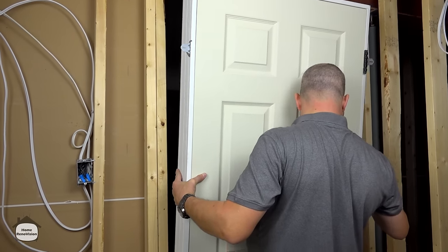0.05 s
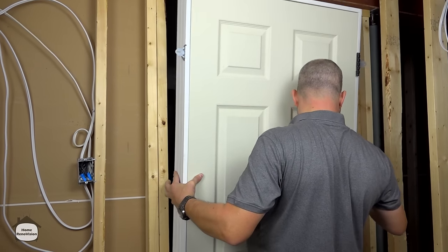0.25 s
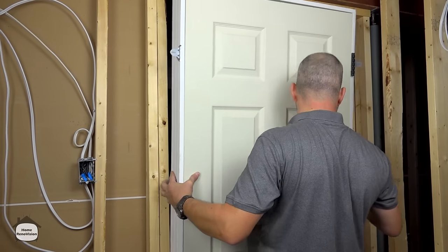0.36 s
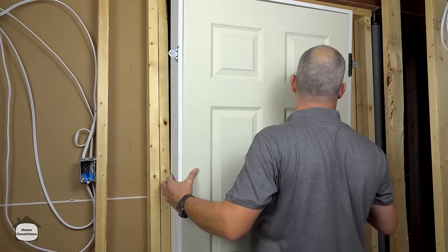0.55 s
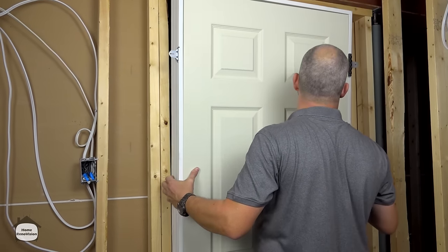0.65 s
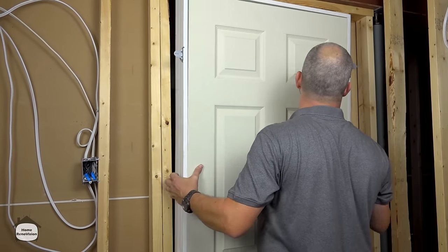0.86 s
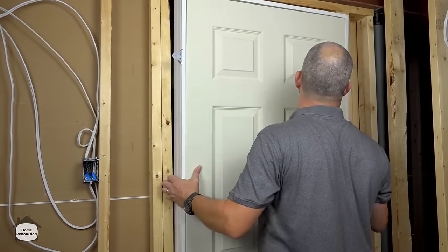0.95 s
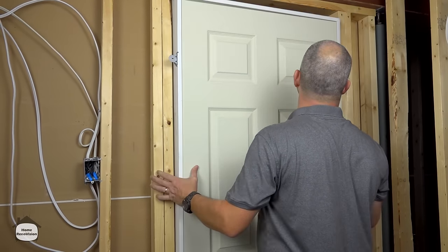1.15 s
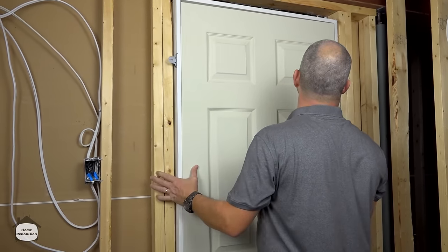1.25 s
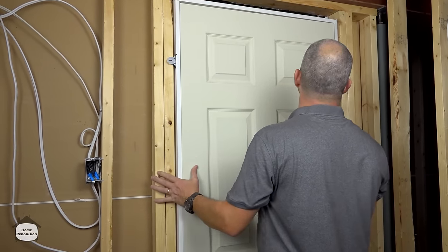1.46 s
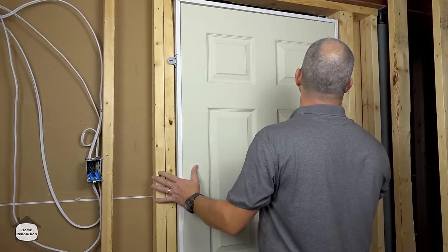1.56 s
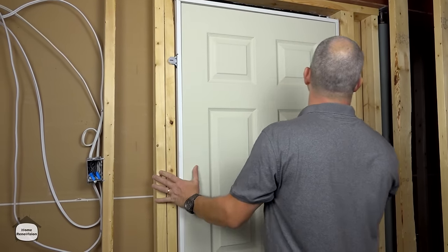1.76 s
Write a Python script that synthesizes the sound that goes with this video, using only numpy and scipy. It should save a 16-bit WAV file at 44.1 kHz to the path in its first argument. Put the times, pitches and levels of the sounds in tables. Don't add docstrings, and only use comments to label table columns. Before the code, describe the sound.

Heavy wooden knocking of a hollow door and frame pushed into a stud opening, close up indoors. A faint knock and gritty hiss start it; at 0.2-0.3 s hard blows cluster with snaps and ticks. Scraping and lighter knocks fade until 0.9 s, when thumps return with low wall booms. Around 1.2-1.4 s another shove cracks sharply, with thin squeaks, then small knocks and rubbing die away.

```python
import sys
import numpy as np
from scipy import signal
from scipy.fft import rfft, irfft, next_fast_len
from scipy.io import wavfile
from scipy.ndimage import map_coordinates

SR = 44100
rng = np.random.default_rng(int(sys.argv[2]) if len(sys.argv) > 2 else 0)


def boost_factor(decibels):
    exponent = np.asarray(decibels, float) / 20
    return 10 ** exponent


def to_wav(sig):
    pcm = np.clip(np.atleast_2d(sig), -1, 1) * 32767
    pcm = np.round(pcm).astype(np.int16)
    wavfile.write(sys.argv[1], SR, pcm.T)


N = 79380


def clock(samples):
    return np.arange(samples) / SR


def unit(x):
    return x / np.sqrt(np.mean(x ** 2) + 1e-20)


def along(points, hz):
    f, v = np.transpose(points)
    return np.interp(np.log(hz + 1), np.log(f + 1), v)


def curves(rows):
    s, *cols = np.transpose(rows)
    return [np.interp(clock(N), s, c) for c in cols]


def wobble(rate_hz):
    knots = rng.standard_normal(int(N * rate_hz / SR) + 4)
    return map_coordinates(knots, [np.arange(N) * rate_hz / SR])


def filtered(x, response):
    m = next_fast_len(len(x) + 8192)
    f = np.fft.rfftfreq(m, 1 / SR)
    return irfft(rfft(x, m) * response(f), m)[:len(x)]


def peak(f, hz, width_hz):
    return 1j * f * width_hz / (hz * hz - f * f + 1j * f * width_hz)


def hiss(points):
    return unit(filtered(rng.standard_normal(N), lambda f: boost_factor(along(points, f))))


def ring(t, hz, db, t60_s, rise_s):
    decay = boost_factor(db - 60 * t / max(t60_s, .003))
    return decay * np.sin(2 * np.pi * hz * t) * (1 - np.exp(-t / rise_s))


def add(track, s, sound):
    part = track[round(s * SR):][:len(sound)]
    part += sound[:len(part)]


# f/Hz, t60/s
WOOD_T60 = [(130, 0.25), (400, 0.13), (1000, 0.085), (3000, 0.072)]


def timber(t, shape, rise_s, count, tilt_db=0):
    lo, hi = np.log(shape[0][0]), np.log(shape[-1][0])
    place, level, sign = rng.random((count, 3)).T
    hz = np.exp(lo + (hi - lo) * (np.arange(count) + place) / count)
    octaves = np.clip(np.log2(hz / shape[1][0]), 0, None)
    db = along(shape, hz) + tilt_db * octaves + 8 * (level - .5)
    return sum(ring(t, f, g, along(WOOD_T60, f), rise_s) * np.sign(u - .5) for f, g, u in zip(hz, db, sign))


# t/s, peak level/dB, panel f/Hz, hardness/dB, panel t60/s
KNOCKS = [(.062, -43, 390, -14, 0.085), (0.129, -38, 220, -8, 0.12), (1.286, -17, 233, -22, 0.057),
          (.213, -19, 435, -12, 0.036), (.230, -3.5, 155, -14, 0.07), (.242, -13.5, 291, -5.5, 0.057),
          (.257, -7, 391.2, -15, 0.079), (0.269, -4, 189, -38, 0.075), (.277, -4.5, 187, -44, 0.038),
          (0.312, -19.5, 149, -32, .04), (.443, -17.5, 299, -10.5, 0.05), (0.456, -20, 268, -16, 0.055),
          (.5, -21.5, 205, -19, 0.046), (.522, -22.5, 315, -28, 0.054), (0.57, -28, 181, -39, 0.086),
          (0.666, -29.5, 188, -30.5, 0.066), (0.912, -22.5, 178, -10.5, 0.11),
          (0.921, -8.5, 133, -16.5, 0.13), (0.938, -4, 135, -36, 0.064), (.981, -13.5, 176, -13.5, 0.075),
          (1.003, -9, 224.3, -19.5, 0.076), (1.029, -12.5, 267, -20, 0.094),
          (1.21, -18.5, 320, -21.5, 0.05), (1.219, -14, 170.5, -9.5, 0.057),
          (1.253, -14.5, 161, -15, 0.053), (1.339, -7, 155, -16, 0.041), (1.365, -14.5, 169, -5, 0.065),
          (1.386, -15.5, 199.4, -6.5, 0.086), (1.498, -21, 140, -15, .08), (1.56, -23, 181.6, -24.5, 0.071),
          (.16, -34, 383, -14, .1), (0.298, -17, 366, -39, 0.08), (0.794, -47.5, 336, -21, 0.089),
          (0.829, -33, 143, -47, 0.075), (1.05, -26.5, 390, -25, .1), (1.424, -23, 140, -27, 0.056)]
# f/Hz, level/dB
SLAB = [(130, -4), (250, -4.5), (400, -4.5), (700, -9.5)]
# f/Hz, level/dB
JAMB = [(500, -2.5), (900, -1.5), (1350, -1.5), (2300, -11.5)]


def knocks():
    out, t = np.zeros(N), clock(SR // 5)
    rise_s, slab_db, slab_follows, jamb_db = 0.0031, -7, 0.41, -10
    soft_dulls = .33
    for s, db, hz, hard_db, t60_s in KNOCKS:
        panel = ring(t, hz, 0, t60_s, rise_s)
        slab = boost_factor(slab_db + slab_follows * hard_db) * timber(t, SLAB, rise_s, count=10)
        jamb = timber(t, JAMB, rise_s=0.00043, count=24, tilt_db=soft_dulls * hard_db)
        add(out, s, boost_factor(db) * (panel + slab + boost_factor(jamb_db + hard_db) * jamb))
    return out


# t/s, level/dB
CRACKS = [
    (1.3385, -11.5),
    (1.3418, -30),
    (1.391, -28.5),
]
# f/Hz, level/dB, t60/s
CRACK_MODES = [(1050, -1, .03), (1600, -5, .02), (2120, -1, .025), (2900, -6, .015), (3270, 0, .022),
               (3800, -2, .016), (5200, -8, .016), (5650, -9, .016)]


def cracks():
    out, t = np.zeros(N), clock(SR // 10)
    for s, db in CRACKS:
        modes = [ring(t, hz, db + g + rng.normal(0, 0.67), t60_s, 0.00068) for hz, g, t60_s in CRACK_MODES]
        add(out, s, sum(modes))
    return out


def burst(hz, db, t60_s, width, roof):
    t = clock(SR // 10)
    noise = rng.standard_normal(len(t))
    noise = unit(filtered(noise, lambda f: peak(f, hz, width * hz) / (1 + 1j * f / (roof * hz)) ** 6))
    return noise * boost_factor(db - 60 * t / max(t60_s, .003)) * (1 - np.exp(-t / 0.00019))


# t/s, peak level/dB, centre f/Hz, t60/s
SNAPS = [(.058, -51.5, 1830, 0.022), (.193, -36.5, 1900, 0.032), (.229, -20.5, 2620, 0.04),
         (.2515, -20, 2690, 0.025), (.238, -17.5, 1530, 0.061), (.913, -35, 3300, 0.037),
         (.921, -31.5, 2210, 0.052), (.980, -39, 2410, 0.073), (.998, -30, 1980, 0.036),
         (1.031, -31, 1520, 0.029), (1.219, -30, 2180, 0.031), (1.3095, -30.5, 2440, 0.017),
         (1.3385, -9.5, 2440, 0.013), (1.3445, -11, 1870, 0.011), (1.347, -33, 6650, 0.13),
         (1.367, -26, 1300, 0.04), (1.392, -19, 2280, 0.043), (1.499, -38, 1760, 0.054),
         (.217, -34, 3020, 0.036), (.245, -26, 1490, .03), (.259, -28, 1700, 0.021),
         (.292, -31, 1710, 0.02), (.127, -49, 1070, 0.033), (1.252, -44, 4200, 0.068),
         (1.263, -37, 1400, 0.017), (1.306, -34.5, 3550, .012), (1.424, -37, 2800, 0.027),
         (1.409, -36, 1700, .025)]


def snaps():
    out = np.zeros(N)
    for s, db, hz, t60_s in SNAPS:
        add(out, s, burst(hz, db - 2, t60_s, width=0.88, roof=2.41))
    return out


# t/s, peak level/dB, centre f/Hz
TICKS = [(0.192, -31, 7900), (0.215, -27, 12800), (0.229, -20, 7700), (0.2339, -18.5, 12300),
         (0.245, -31, 11100), (0.25, -47, 6960), (0.915, -35, 10000), (0.9181, -30, 10900),
         (.981, -39, 8500), (0.997, -40, 11500), (1.0047, -25, 13300), (1.2534, -42, 9100),
         (1.3394, -18, 5940), (1.342, -15, 7300), (.88, -55, 5800), (.795, -50, 11100)]


def ticks():
    out = np.zeros(N)
    for s, db, hz in TICKS:
        add(out, s, burst(hz, db - 5.5, t60_s=.012, width=0.63, roof=1.77))
    return out


# t/s, level/dB, focus of the resonances/dB
SLIDE = [(0, -69, 5), (.045, -55.5, 17), (.19, -50.5, 3.5), (.3, -54.5, -2), (.5, -57, -5.5), (.6, -64, 1),
         (.78, -67, 1), (.85, -76.5, -4), (.91, -69.5, -19), (.93, -55, -26), (1.1, -62.5, -7),
         (1.25, -48.5, -6.5), (1.42, -54, -4), (1.58, -58, -40), (1.65, -60, -21), (1.685, -67.5, -10),
         (1.72, -60, -28), (1.8, -67, -28)]
# f/Hz, width/Hz, level/dB
RUB = [(6050, 550, -6), (8050, 600, -12), (9900, 1300, 0), (11600, 700, -7), (13150, 700, -5),
       (15300, 500, -11)]
# f/Hz, level/dB
RUB_BROAD = [(300, -120), (1000, 5), (3000, 0), (8000, -7), (12000, -7.5), (16000, -14)]


def rubbing():
    level_db, focus_db = curves(SLIDE)
    noise, sag = rng.standard_normal(N), .07
    place = np.clip(clock(N) - .4, 0, .5) * 4
    edge = np.zeros(N)
    for k, scale in enumerate((1, 1 - sag / 2, 1 - sag)):
        tone = unit(filtered(noise, lambda f: sum(boost_factor(g) * abs(peak(f, c * scale, w)) ** 2 for c, w, g in RUB)))
        edge += tone * np.clip(1 - abs(place - k), 0, 1) ** .5
    share = boost_factor(focus_db) / np.sqrt(1 + boost_factor(focus_db) ** 2)
    broad = np.sqrt(1 - share ** 2) * 1.155 * hiss(RUB_BROAD)
    grit_db, gust_db = 1 * wobble(210), 1.2 * wobble(26.34)
    return boost_factor(level_db + grit_db + gust_db) * (share * edge + broad)


# t/s, rumble level/dB, slab hum level/dB
GROAN = [(0, -59, -67), (.06, -52, -57), (.12, -55.5, -50.5), (.2, -36, -41.5), (.4, -35.5, -56),
         (.6, -46, -56), (.8, -49, -60.5), (.9, -61, -65.5), (1.1, -45.5, -60), (1.19, -46, -68),
         (1.28, -32, -39), (1.45, -36, -54), (1.62, -43.5, -74), (1.72, -48, -66), (1.8, -50, -61)]
# f/Hz, level/dB
GROAN_COLOUR = [(15, -42), (35, -2), (90, -0.5), (180, -17), (380, -19), (1100, -26), (4000, -43.5),
                (6000, -99)]
# f/Hz, width/Hz, level/dB
HUM = [(140, 57, 0.5), (251, 34, 2), (390, 59, -1)]


def groaning():
    drag_db, hum_db = curves(GROAN)
    noise = rng.standard_normal(N)
    hum = unit(filtered(noise, lambda f: sum(boost_factor(g) * peak(f, c, w) ** 2 for c, w, g in HUM)))
    rumble = boost_factor(drag_db + 0.83 * wobble(29.27)) * hiss(GROAN_COLOUR)
    return rumble + boost_factor(hum_db + 3.3 * wobble(32.2)) * hum


# t/s, length/s, from f/Hz, to f/Hz, level/dB
SQUEAKS = [(1.078, .08, 13600, 15750, -66), (1.418, .04, 16000, 14450, -63), (.085, .05, 2120, 2120, -66),
           (1.27, .065, 10700, 9800, -63), (1.545, .07, 8900, 9350, -66), (1.13, .07, 5300, 5250, -71),
           (1.03, .12, 13400, 11600, -75), (1.11, .05, 9600, 10100, -71), (1.165, .04, 9100, 9300, -69),
           (.56, .12, 10100, 9700, -74), (.66, .13, 9750, 9150, -70), (1.53, .06, 13100, 12900, -72)]


def squeaks():
    out, waver_hz, flicker_db = np.zeros(N), 90 * wobble(130), 3 * wobble(150)
    for s, length_s, from_hz, to_hz, db in SQUEAKS:
        u = np.clip((clock(N) - s) / length_s, 0, 1)
        hz = from_hz + (to_hz - from_hz) * u ** .62 + waver_hz
        swell = np.sin(np.pi * u) ** .5 * (u < 1)
        out += swell * boost_factor(db + flicker_db) * np.sin(2 * np.pi * np.cumsum(hz) / SR)
    return out


# t/s, level/dB, f/Hz, t60/s
BOOMS = [(0.063, -40, 70.3, 0.38), (0.129, -38, 92.4, 0.75), (0.232, -18.5, 88.4, 0.43),
         (0.272, -13, 52.5, 0.57), (0.406, -21, 59, 0.16), (0.557, -25, 43.2, 0.14),
         (0.68, -18.5, 62.7, 0.074), (0.771, -34.5, 49.2, 0.75), (.916, -11.5, 55, 0.13),
         (0.976, -8, 63.8, 0.2), (1.079, -25, 60, 0.43), (1.213, -30.5, 61, 0.41), (1.307, -13.5, 64, 0.19),
         (1.342, -11, 81, 0.22), (1.359, -14.5, 51, 0.51), (1.404, -15.5, 76.2, 0.31),
         (1.499, -25.5, 87.8, 0.49), (1.656, -31, 86, 0.1), (1.442, -25, 134, 0.18),
         (1.57, -30.5, 140, 0.27), (.79, -38, 144.6, 0.47), (.455, -21, 57, 0.12)]


def wall():
    out, t = np.zeros(N), clock(SR // 2)
    for s, db, hz, t60_s in BOOMS:
        add(out, s, ring(t, hz, db, t60_s, rise_s=.008))
    return out


def loose_strip():
    out, t = np.zeros(N), clock(SR // 2)
    add(out, 1.309, ring(t, 975, -27.5, .15, .001) / (1 + (t / .017) ** 8))
    return out


# f/Hz, t60/s
ROOM = [(90, 0.78), (190, 0.38), (500, 0.18), (2000, 0.24), (6000, 0.26), (14000, 0.06)]


def room(x):
    out, hop = np.zeros(N), SR // 4
    for start in range(0, N, hop):
        hz, t, z = signal.stft(rng.standard_normal(SR * 3 // 4), SR, nperseg=256)
        decay = boost_factor(-60 * t / along(ROOM, hz)[:, None])
        tail = signal.istft(z * decay, SR, nperseg=256)[1]
        wet = signal.fftconvolve(x[start:start + hop], tail / np.linalg.norm(tail))
        add(out, start / SR + .006, wet)
    return out


def floor_noise():
    return boost_factor(-99) * rng.standard_normal(N)


def scene():
    room_db, wall_send_db = -11, -9
    blows = knocks() + cracks() + snaps() + ticks()
    boom = wall() + loose_strip()
    wet = boost_factor(room_db) * room(blows + boost_factor(wall_send_db) * boom)
    friction = rubbing() + groaning() + squeaks()
    return (blows + boom + wet + friction + floor_noise())[None]


def band_limit(x):
    return signal.sosfilt(signal.butter(12, 15950, fs=SR, output="sos"), x)


def record(dry):
    bass_hz, ceiling, top_hz = 17, .62, 15700
    x = filtered(dry[0], lambda f: (1j * f / (bass_hz + 1j * f)) ** 2)
    x = x / (1 + abs(x / ceiling) ** 4) ** .25
    mix = filtered(x, lambda f: f < top_hz)[None]
    return band_limit(mix)


dry = scene()
out = record(dry)
to_wav(out)
```